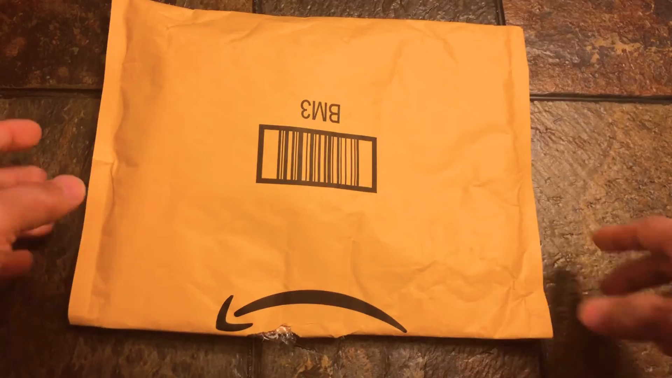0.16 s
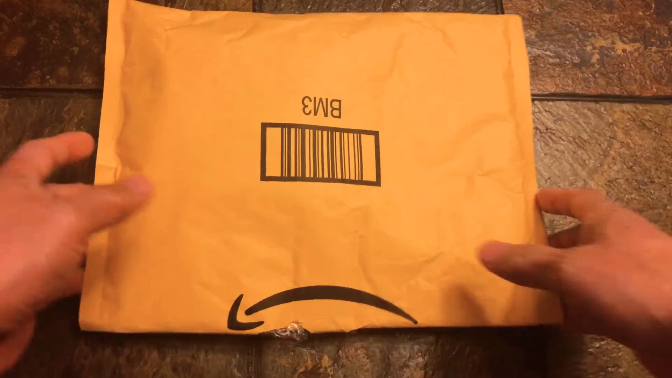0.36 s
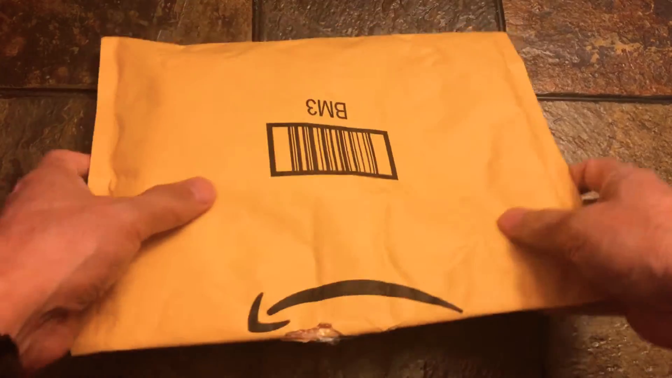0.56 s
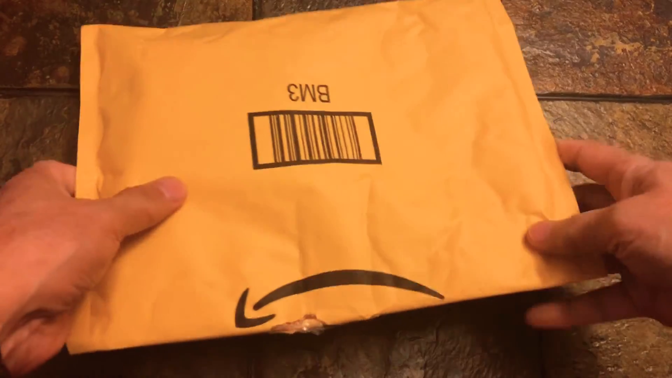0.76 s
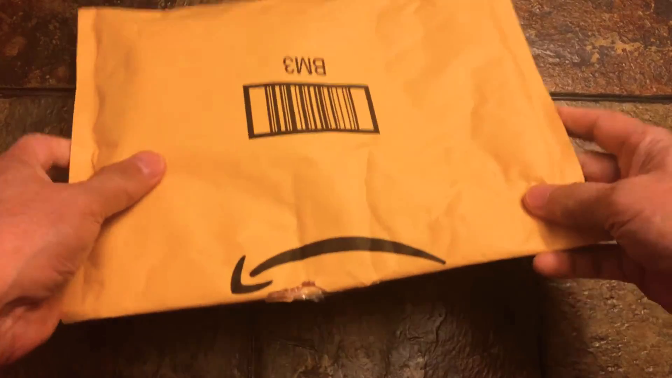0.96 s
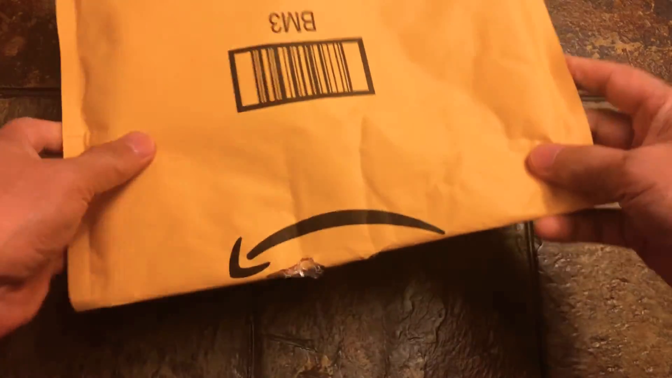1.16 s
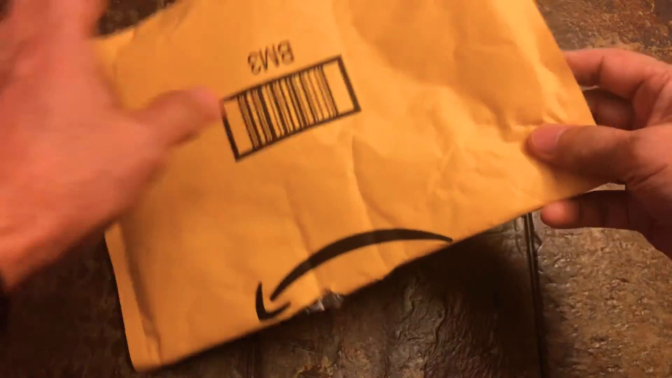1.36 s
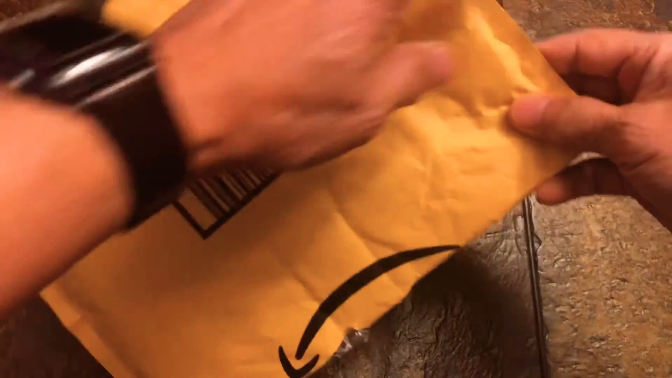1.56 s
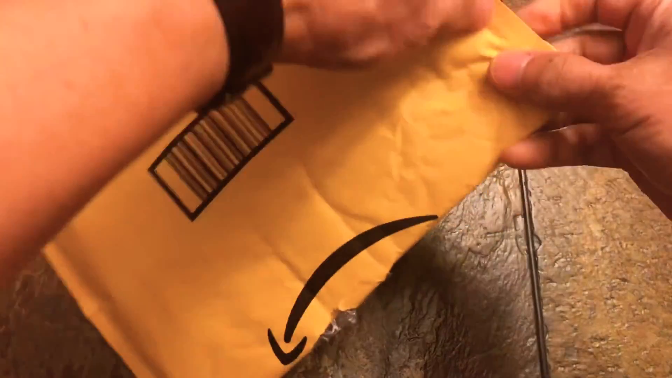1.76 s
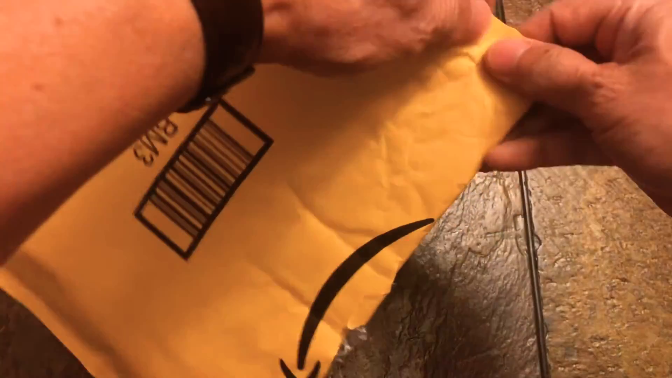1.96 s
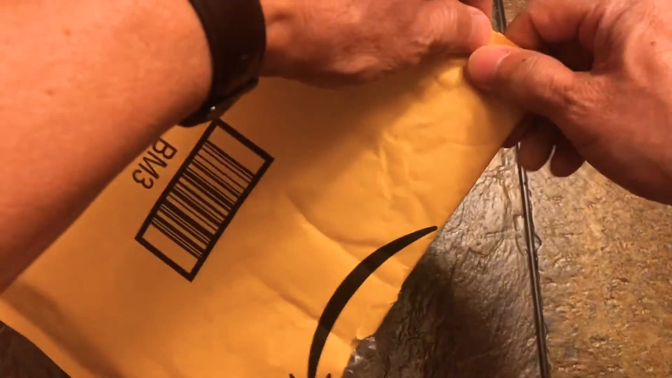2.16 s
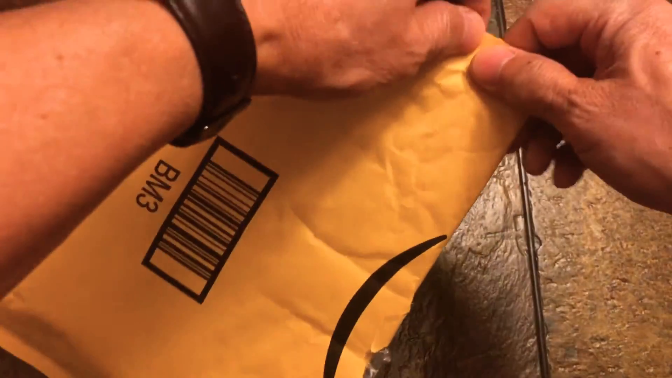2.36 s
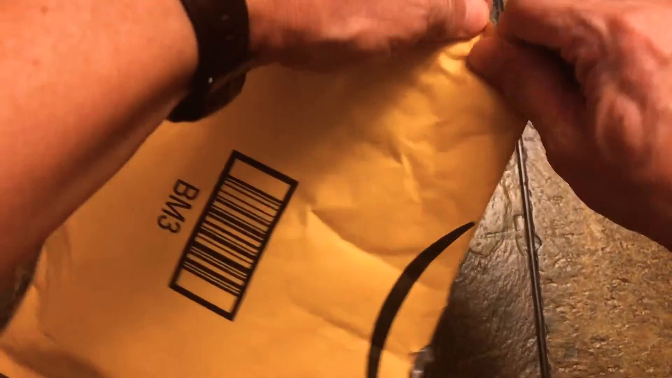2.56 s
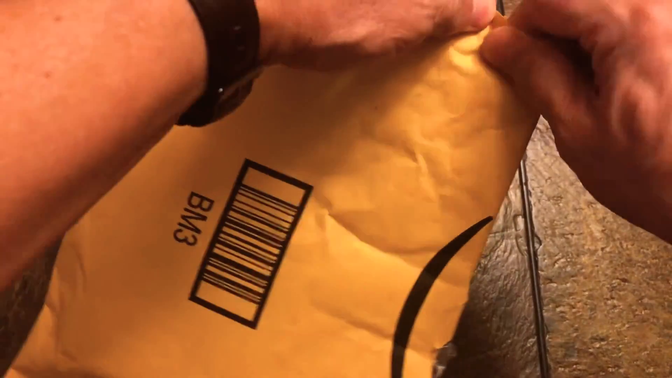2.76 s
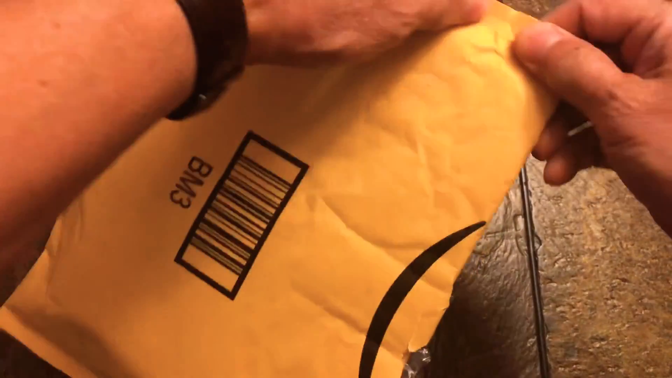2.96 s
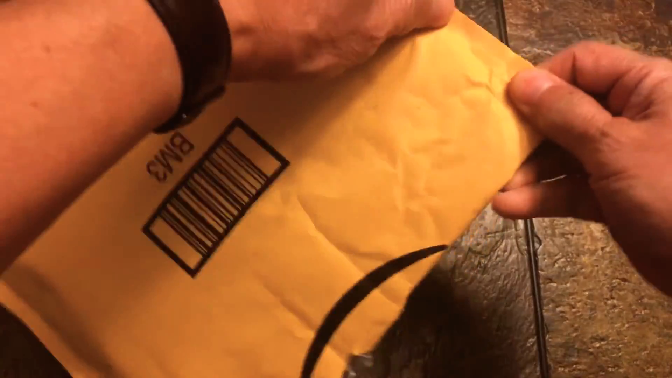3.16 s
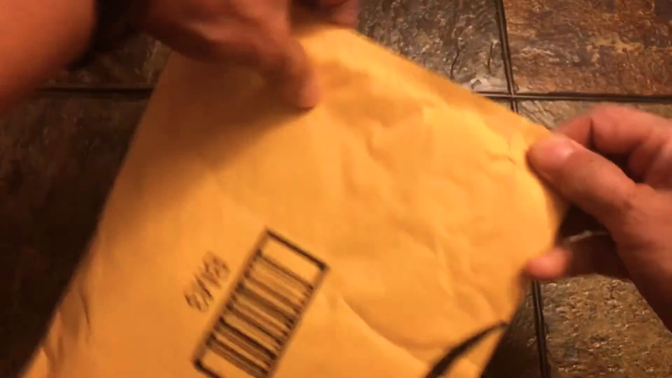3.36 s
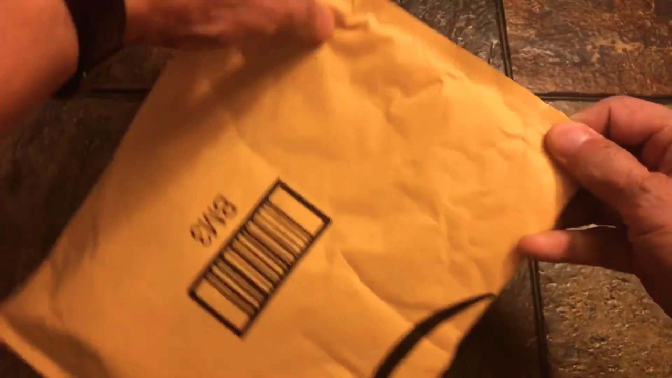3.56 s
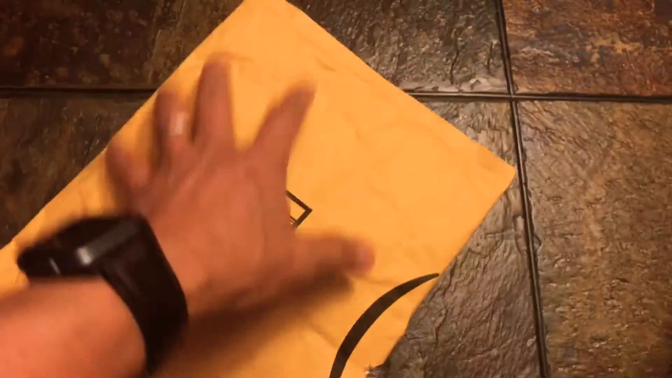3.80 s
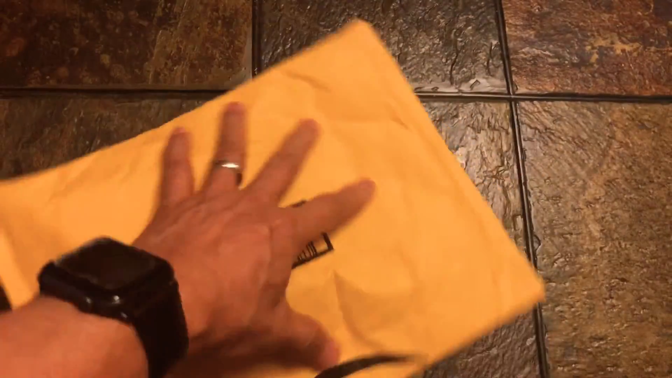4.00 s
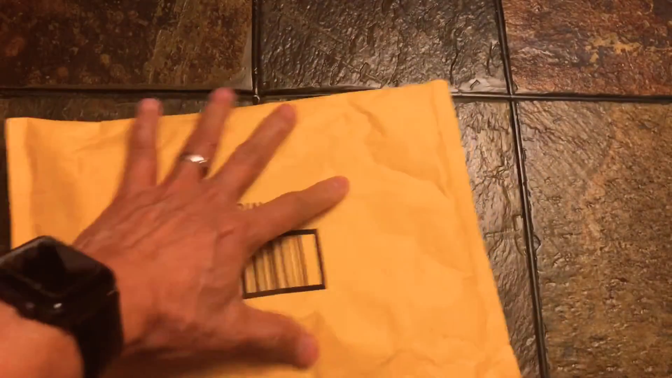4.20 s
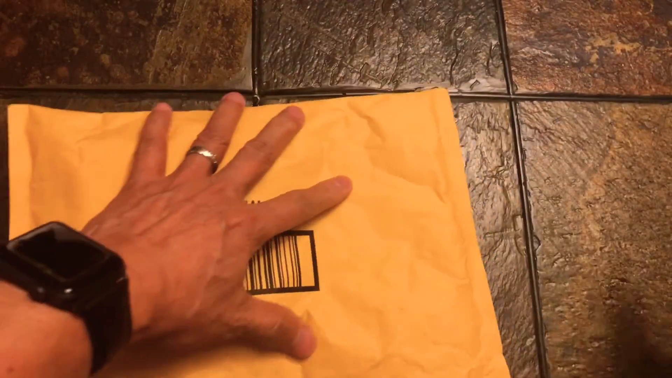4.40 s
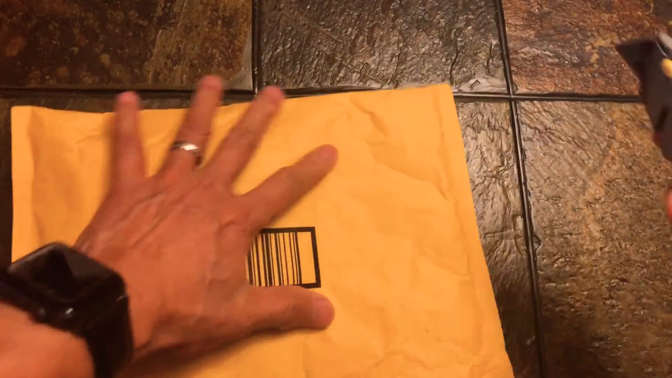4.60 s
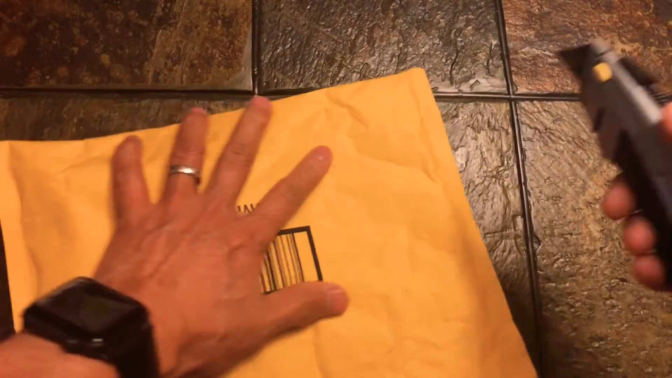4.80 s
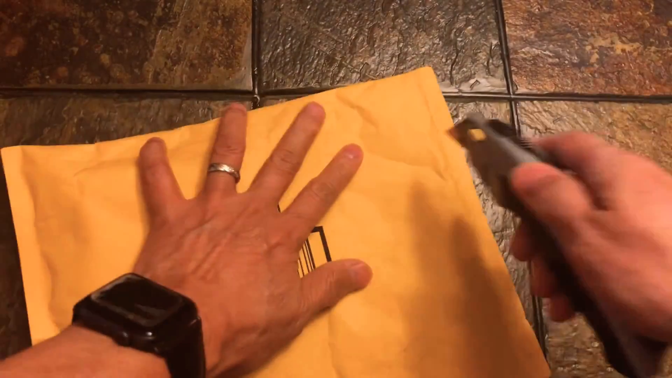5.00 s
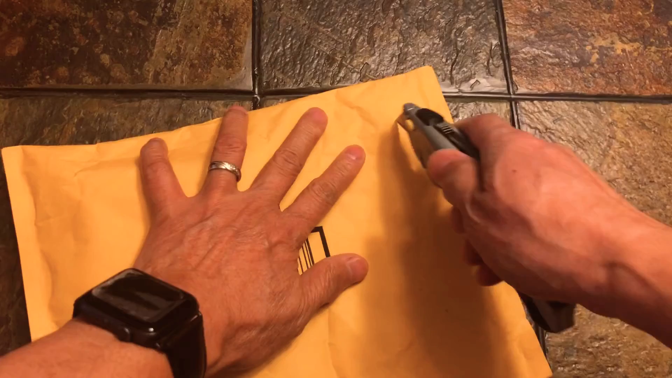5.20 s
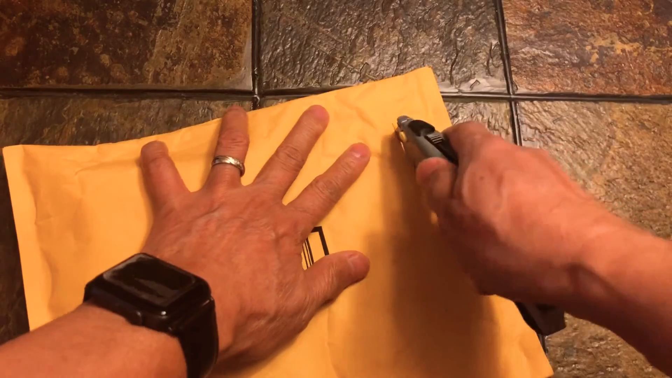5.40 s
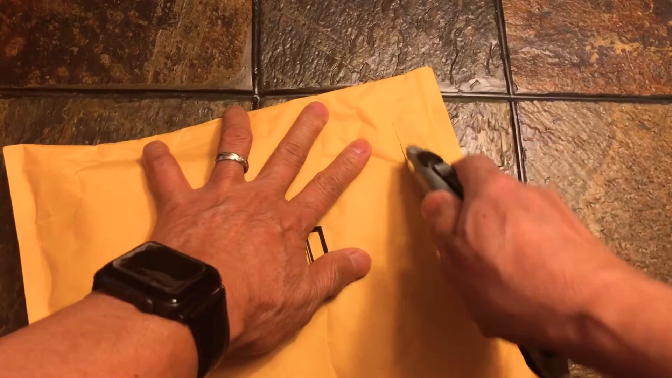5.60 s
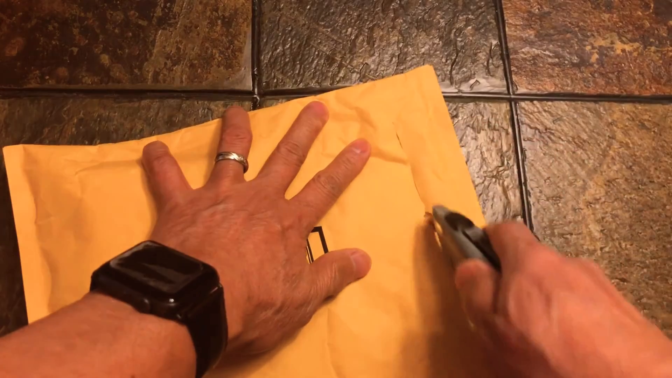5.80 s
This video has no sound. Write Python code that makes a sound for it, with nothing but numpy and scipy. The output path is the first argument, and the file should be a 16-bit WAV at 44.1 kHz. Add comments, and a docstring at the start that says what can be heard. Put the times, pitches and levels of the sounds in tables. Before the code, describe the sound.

Close, dry crackling and rubbing of a thick paper mailer in a quiet hard room, ending with a sharp pop and a rasping cut.

```python
"""Tiled floor, heard up close: hands slide, turn and flex a padded paper mailer.
Rubbing is noise and fibre slips in three bands: padding, sheet, surface.
Buckling creases are short dispersed pulses: single snaps, quick runs, random crinkles; padding bumps are
damped low sines. At the end a knife squeaks, punctures the paper and starts to slit it with a ratchet
of fibre breaks. A small hard room answers the strikes; a faint background noise lies below."""
import sys
import numpy as np
from scipy import signal
from scipy.fft import rfft, irfft, next_fast_len
from scipy.io import wavfile
from scipy.ndimage import uniform_filter1d, map_coordinates

SR = 44100
rng = np.random.default_rng(int(sys.argv[2]) if len(sys.argv) > 2 else 0)


def waveform_to_disk(signal):
    """Save audio, clipped to [-1, 1], as 16-bit WAV at the path in sys.argv[1]."""
    frames = np.transpose(np.atleast_2d(signal))
    scaled = np.clip(frames, -1, 1) * 32767
    samples = np.round(scaled).astype(np.int16)
    wavfile.write(sys.argv[1], SR, samples)


N = 257984
TIME = np.arange(N) / SR  # s
GRAB_S, SLIT_START_S = .4, 5.6


def amp(db):
    """Decibels to gain."""
    return 10 ** (np.asarray(db) / 20)


def unit(x):
    """x at rms 1."""
    return x / np.sqrt(np.mean(x ** 2) + 1e-20)


def along(points, hz):
    """(Hz, value) points read on a log frequency axis."""
    point_hz, value = np.transpose(points)
    return np.interp(np.log(hz + 1), np.log(point_hz), value)


def filtered(x, response):
    """x times a response of frequency."""
    size = next_fast_len(N + SR // 2)
    hz = np.fft.rfftfreq(size, 1 / SR)
    return irfft(rfft(x, size) * response(hz), size)[:N]


def coloured(x, spectrum):
    """x through a spectrum that falls steeply beyond its ends, at rms 1."""
    low_hz, high_hz = spectrum[0][0], spectrum[-1][0]

    def response(hz):
        skirts = np.minimum(hz / low_hz, 1) ** 2 * np.minimum(high_hz / (hz + 1), 1) ** 2
        return amp(along(spectrum, hz)) * skirts
    return unit(filtered(x, response))


def wobble(knots_per_s):
    """Smooth curve through normal random knots."""
    knots = rng.standard_normal(int(N * knots_per_s / SR) + 4)
    return map_coordinates(knots, [TIME * knots_per_s])


def add(track, start_s, sound):
    """Mix a sound into the track, cut at the track's end."""
    span = track[max(round(start_s * SR), 0):][:len(sound)]
    span += sound[:len(span)]


# quiet-room noise: freq_hz, relative_density_db (per Hz)
BACKGROUND_SPECTRUM = [(45, -6), (100, -4), (400, -7), (700, -16), (5000, -22), (15000, -37)]


def background(level_db=-64.5):
    """Steady noise, its density falling towards the treble."""
    return amp(level_db) * coloured(rng.standard_normal(N), BACKGROUND_SPECTRUM)


# hand or blade sliding over paper: start_s, rise_s, length_s, sheet_db,
# padding_rel_db (to sheet), surface_rel_db (to sheet)
SLIDES = [(0, 0.0047, 0.013, -54.5, -25, -2), (0.388, .012, .13, -49.5, -11.5, -0.5),
          (0.519, 0.0085, .105, -38.5, -15.5, -2), (0.681, 0.036, .18, -48.5, -17, 3.5),
          (0.879, 0.033, .19, -51.5, -22, 2), (1.246, .025, .055, -41.5, -16, 0.5),
          (1.367, .07, .17, -45, -13, 0.5), (1.617, .015, .03, -46.5, -4, -24),
          (1.69, 0.016, 0.09, -55, -6, 8.5), (1.797, 0.02, .085, -43, -8, 1.5),
          (1.899, .05, .19, -47, -5, 1), (2.174, 0.015, .2, -56, -21, 6.5),
          (2.503, .11, .125, -43, -7.5, 2), (2.65, 0.025, .06, -48.5, -11, 4.5),
          (2.821, .17, .33, -46, -8, 3.5), (3.191, .02, .065, -43.5, -8, -8),
          (3.322, .02, 0.068, -45.5, -5, 4.5), (3.374, .07, .095, -37, -6.5, -0.5),
          (3.6, .04, 0.096, -39, -9.5, -2), (3.802, 0.011, .015, -44.5, -0.5, -6),
          (3.901, 0.035, .055, -34, -5, -4.5), (3.997, 0.026, .31, -41.5, -9, -2.5),
          (4.409, .11, .12, -45, -6, 4.5), (4.569, .03, .26, -48.5, -19, -1),
          (4.822, .05, .26, -44, -18.5, 0.5), (5.275, .04, .055, -43, -59.5, -2.5),
          (5.357, 0.016, .08, -53, -28, 5), (5.455, 0.0056, .04, -35.5, -17.5, -2.5),
          (5.581, 0.028, 0.13, -43, -6, 4), (5.736, 0.006, 0.092, -37, -6.5, -2.5)]
# faint rub of hands that never quite rest: padding_db, sheet_db, surface_db
HOLDING = (-72, -58.5, -57.5)


def contact(sag_db_per_s=6.5, release_db_per_s=116.5):
    """Padding, sheet, surface levels in dB: slides speed up, slacken and run out, over the holding rub."""
    power = np.outer(amp(HOLDING) ** 2, TIME > GRAB_S)
    for start_s, rise_s, length_s, sheet_db, padding_rel_db, surface_rel_db in SLIDES:
        age_s = np.maximum(TIME - start_s, 0)
        # release adds to the sag once the length is over
        fade_db = sag_db_per_s * age_s + release_db_per_s * np.maximum(age_s - length_s, 0)
        speed = np.minimum(age_s / rise_s, 1) * amp(sheet_db - fade_db)
        power = power + np.outer(amp([padding_rel_db, 0, surface_rel_db]), speed) ** 2
    return 10 * np.log10(power + 1e-12)


def friction(slips_per_s, smooth_rms=.75):
    """Fibres catch and slip: impulses of uneven size at rms 1, over smooth sliding noise."""
    slips = (rng.random(N) < slips_per_s / SR) * rng.standard_normal(N)
    return unit(slips) + smooth_rms * rng.standard_normal(N)


def shifting(x, depth_db):
    """As the sheet bends, its many small resonances come and go."""
    spectrogram = signal.stft(x, nperseg=512)[2]
    field = rng.standard_normal(spectrogram.shape)
    field = uniform_filter1d(field, 4, axis=0)  # over frequency
    field = uniform_filter1d(field, 7, axis=1)  # over time
    return signal.istft(spectrogram * amp(depth_db * unit(field)), nperseg=512)[1][:N]


# spectra of the rubbing parts: freq_hz, relative_density_db (per Hz)
PADDING_SPECTRUM = [(45, -5.5), (85, 0), (150, -3), (195, 4), (250, -1.5), (340, 2.5), (480, -3.5)]
SHEET_SPECTRUM = [(300, -6), (450, 1), (640, -3), (950, 1.5), (1750, 4.5), (2400, -14), (3500, -0.5)]
SURFACE_SPECTRUM = [(1600, -12), (2600, -8.5), (3400, -8), (5500, -8.5), (8200, -9.5), (10500, -13.5),
                    (16000, -19.5)]


def rubbing(padding_db, sheet_db, surface_db):
    """Sliding contact sounds in padding, sheet and surface; wavering grip moves the last two together."""
    grip = wobble(45)
    padding = coloured(rng.standard_normal(N), PADDING_SPECTRUM)
    sheet = coloured(shifting(friction(600), depth_db=3.5), SHEET_SPECTRUM)
    surface = coloured(shifting(friction(1200), depth_db=3.0), SURFACE_SPECTRUM)
    padding = amp(padding_db + 3.65 * wobble(35)) * padding
    sheet = amp(sheet_db - 1.0 + 2.0 * grip) * sheet
    surface = amp(surface_db + grip) * surface
    return padding + sheet + surface


def brightening(rub, surface_db, slope_db_per_db=0.36, neutral_db=-45, corner_hz=9000):
    """Stronger surface sliding opens the top treble; weaker sliding dulls it."""
    top = filtered(rub, lambda hz: hz ** 6 / (hz ** 6 + corner_hz ** 6))
    boost_db = slope_db_per_db * np.clip(surface_db - neutral_db, -12, 12)
    return rub + top * (amp(boost_db) - 1)


def buckle(pitch_hz, crack_db, size=2048):
    """A paper facet flips: short ring, crack, low flap; energy of 1 ms at rms 1."""
    sharp_q, clean_q, clean_below_db = 0.84, 1.5, -48
    crack_hz, dull_hz = 5200, 9000
    flap_db, flap_hz = -13.0, 480  # flap level for a 1900 Hz facet
    body_delay_s, flap_delay_s = 0.000386, .0016  # at 1 kHz
    scatter, scatter_t60_s, scatter_rise_s = 0.61, 0.0095, 0.0017
    hz, t = np.fft.rfftfreq(size, 1 / SR) + 1, np.arange(size) / SR

    def resonance(centre_hz, q):
        return 1 / (1 + 1j * q * (hz / centre_hz - centre_hz / hz))

    # a clean flip, without a crack, rings longer
    q = np.interp(crack_db, [clean_below_db, 0], [clean_q, sharp_q])
    body = unit(resonance(pitch_hz, q) ** 2.16 / (1 + 1j * hz / dull_hz))
    crack = amp(crack_db) * unit(resonance(crack_hz, 0.97) ** 2)
    # small, high-pitched facets hardly move the whole sheet
    flap_gain = amp(flap_db) * 2 / (1 + (pitch_hz / 1900) ** 2)
    flap = flap_gain * unit(resonance(flap_hz, 0.82) ** 2)
    # bending waves: treble arrives first; the flap trails as a falling chirp
    pulse = (body + crack) * np.exp(-4j * np.pi * body_delay_s * np.sqrt(hz * 1000))
    pulse = pulse + flap * np.exp(-2j * np.pi * flap_delay_s * 1000 * np.log(hz))
    # seams and folds throw the wave back for a few milliseconds
    echoes = rng.standard_normal(size) * amp(-60 * t / scatter_t60_s) * (1 - np.exp(-t / scatter_rise_s))
    echoes = echoes / np.linalg.norm(echoes)
    wave = irfft(pulse * (1 + scatter * rfft(echoes)))
    return wave / np.linalg.norm(wave) * np.sqrt(SR / 1000)


def crinkles(sheet_db, count=600):
    """Small facets flip at random, more often and more strongly as the sheet is worked, grab to slit."""
    offset_db, follow_db_per_db, crowding, ceiling_db = -2, 0.85, .055, -28
    median_hz, pitch_spread, size_spread_db = 2100, 0.63, 6.5
    track = np.zeros(N)
    due = np.cumsum(amp(crowding * sheet_db) * (TIME > GRAB_S) * (TIME < SLIT_START_S))
    places = np.searchsorted(due, due[-1] * rng.random(count))
    variations = np.clip(rng.standard_normal((count, 3)), -2, 2)
    for place, (strength, facet, edge) in zip(places, variations):
        wave = buckle(median_hz * np.exp(pitch_spread * facet), crack_db=-12 + 8 * edge)
        level_db = offset_db + follow_db_per_db * sheet_db[place] + size_spread_db * strength
        add(track, place / SR, amp(min(level_db, ceiling_db)) * wave)
    return track


# loud creases buckling: start_s, level_db (energy as 1 ms rms), pitch_hz, crack_rel_db (to body)
SNAPS = [(0.403, -32.5, 1010, -25), (0.445, -31, 3647, -18), (0.465, -31, 4500, -20),
         (0.491, -35.5, 2893, -10), (0.5284, -14, 4970, -40), (0.5993, -19.5, 3790, 0.5),
         (0.6266, -23, 1580, -20.5), (0.6467, -24, 1748, -1), (0.7863, -23, 1740, -15),
         (0.8193, -17, 2220, -2), (0.8597, -27, 1510, -3), (0.937, -30, 607, -19),
         (0.9631, -21.5, 1670, -49), (1.304, -30, 570, -40), (1.4075, -26, 1273, 7),
         (1.4325, -20.5, 1860, -2), (1.468, -8, 2600, -17.5), (1.7222, -27.5, 1340, -6),
         (1.839, -26, 1400, 4), (1.9084, -29.5, 1600, -25), (1.932, -25.5, 400, -7),
         (2.0628, -26, 1850, -23), (2.1968, -8, 4030, 2), (2.2007, -17.5, 2370, 6.5),
         (2.549, -24.5, 1980, -2), (2.581, -13.5, 3400, -5), (2.66, -24.5, 1560, 0.5),
         (2.702, -23.5, 1900, -0.5), (2.7913, -24, 1880, -7), (2.808, -30.5, 630, -36),
         (2.9434, -23, 1280, -9), (2.967, -11.5, 3230, -36), (3.1213, -17, 1630, 9),
         (3.207, -28.5, 750, -7), (3.228, -33, 1360, -7), (3.2747, -21.5, 1990, 0),
         (3.382, -18.5, 1750, -1.5), (3.3992, -21.5, 3470, -12), (3.498, -23, 1410, -12),
         (3.5115, -22.5, 1350, -30), (3.5318, -25, 1480, -18), (3.657, -27, 4370, -16),
         (3.7207, -20, 1420, 0), (3.8274, -23.5, 1190, 1.5), (3.915, -29, 1460, -30),
         (3.9352, -20.5, 3260, -5), (3.9482, -16, 1760, -0.5), (3.9601, -19.5, 1219, -7),
         (4.259, -22, 1400, 11), (4.3116, -15.5, 1540, -45), (4.3205, -20, 1400, -37),
         (4.516, -24.5, 775, -1.5), (4.55, -24, 1560, -20), (4.6007, -17, 1360, 5.5),
         (4.7383, -28, 1150, -17), (4.7856, -22, 1390, -5.5), (4.807, -27, 1410, -18),
         (4.905, -23, 1400, -22), (4.987, -15, 1310, -5.5), (5.048, -11.5, 2040, -5),
         (5.084, -25.5, 2570, -18), (5.1284, -20, 1140, -9), (5.2753, -21, 1300, -7.5),
         (5.28, -22, 1170, 2.5), (5.3175, -20.5, 1620, -22.5), (5.331, -18, 2500, -1),
         (5.4124, -22, 1800, -9), (5.4555, -6.5, 1310, -1.5), (5.5316, -12.5, 2140, 3.5),
         (5.5472, -15.5, 2920, -9), (5.5961, -9, 2950, 1.5), (5.6587, -19, 2770, -5),
         (5.826, -15, 2420, -1.5), (5.8337, -20, 2120, -14)]


def snaps():
    """Loud creases buckle, each at the pitch of its own facet."""
    track = np.zeros(N)
    for start_s, level_db, pitch_hz, crack_rel_db in SNAPS:
        add(track, start_s, amp(level_db) * buckle(pitch_hz, crack_rel_db))
    return track


def hollow(x, ring_hz=950, ring_gain=0.24, dip_hz=620, dip_gain=0.15):
    """Air inside the mailer adds a short ring with a dip below it."""
    def mode(hz, centre_hz):
        return 1 / (1 + 3.5j * (hz / centre_hz - centre_hz / (hz + 1)))
    return filtered(x, lambda hz: 1 + ring_gain * mode(hz, ring_hz) - dip_gain * mode(hz, dip_hz))


# small hard room: freq_hz, t60_s
ROOM_DECAY = [(1500, 0.93), (15000, 0.14)]


def room(x):
    """Convolve with decaying noise of unit energy; treble dies first."""
    hz, t, spectrogram = signal.stft(rng.standard_normal(SR // 2), SR, nperseg=256)
    decay = amp(-60 * t / along(ROOM_DECAY, hz)[:, None])
    tail = signal.istft(spectrogram * decay, SR, nperseg=256)[1]
    return signal.fftconvolve(x, tail / np.linalg.norm(tail))[:N]


# soft bumps of the padded bag: start_s, level_db (before makeup and envelope), pitch_hz (nominal)
BUMPS = [(0.612, -30, 411), (1.657, -35.5, 228), (2.614, -28.5, 260.6), (2.623, -28.5, 138),
         (3.304, -36, 83.6), (3.731, -28.5, 101), (3.828, -30, 172)]


def bumps(t60_s=0.028, attack_s=0.0024, sag_s=0.0072, makeup_db=5.0):
    """Air-filled padding: a low damped push, pitch sagging from 1.23 to 0.73 of nominal."""
    track, t = np.zeros(N), np.arange(SR // 4) / SR
    for start_s, level_db, pitch_hz in BUMPS:
        cycles = pitch_hz * (0.73 * t + .5 * sag_s * (1 - np.exp(-t / sag_s)))
        envelope = amp(level_db + makeup_db - 60 * t / t60_s) * (1 - np.exp(-t / attack_s))
        add(track, start_s, envelope * np.sin(2 * np.pi * cycles))
    return track


# quick runs of breaks, the last three the blade's puncture and tugs:
# start_s, length_s, level_db (median break), pitch_hz (median)
RUNS = [(2.603, 0.02, -36, 1205), (3.445, 0.017, -32.5, 2180), (5.4601, 0.01, -19.5, 2460),
        (5.697, .022, -28, 2220), (5.741, .042, -26, 2430)]


def runs(crack_db=-10, pitch_spread=0.28, size_spread_db=2.5, count=16):
    """Facets and fibres give way one after another, each with its own size and pitch."""
    track = np.zeros(N)
    for start_s, length_s, level_db, pitch_hz in RUNS:
        times_s = start_s + length_s * (np.arange(count) + rng.random(count)) / count
        for break_s, (strength, facet) in zip(times_s, rng.standard_normal((count, 2))):
            wave = buckle(pitch_hz * np.exp(pitch_spread * facet), crack_db)
            add(track, break_s, amp(level_db + size_spread_db * strength) * wave)
    return track


# blade touching the paper: start_s, length_s, pitch_hz
SQUEAK = (5.305, .013, 13400)


def squeak(level_db=-36, width_hz=1600):
    """Thin stick-slip whistle of steel on paper: a noise band under a half-sine envelope."""
    start_s, length_s, pitch_hz = SQUEAK
    band = filtered(rng.standard_normal(N), lambda hz: np.exp(-((hz - pitch_hz) / width_hz) ** 2))
    envelope = np.sin(np.pi * np.clip((TIME - start_s) / length_s, 0, 1))
    return amp(level_db) * unit(band) * envelope


# slit edge's colour over the rubbing: freq_hz, gain_db
SLIT_COLOUR = [(50, -10), (260, 4.5), (600, -11), (1200, -16), (1800, 9), (2900, -3), (6000, 3)]


def slitting(rub, sheet_db, count=100):
    """The slit edge recolours the rub; fibres part in a quick uneven ratchet, each at its own pitch."""
    level_rel_db, size_spread_db = 8.5, 4  # level relative to sheet_db
    median_hz, pitch_spread, fade_in_s = 2450, 0.15, 0.012
    cutting = np.clip((TIME - SLIT_START_S) / fade_in_s, 0, 1)
    rasp = filtered(rub, lambda hz: amp(along(SLIT_COLOUR, hz)))
    track = (1 - cutting) * rub + cutting * rasp
    progress = (np.arange(count) + rng.random(count)) / count
    times_s = SLIT_START_S + progress * (N / SR - SLIT_START_S)
    variations = np.clip(rng.standard_normal((count, 2)), -2, 2)
    for break_s, (strength, fibre) in zip(times_s, variations):
        wave = buckle(median_hz * np.exp(pitch_spread * fibre), crack_db=-22)
        level_db = sheet_db[int(break_s * SR)] + level_rel_db + size_spread_db * strength
        add(track, break_s, amp(level_db) * wave)
    return track


def scene():
    """Rubbing and slitting, strikes with their room, and the background."""
    padding_db, sheet_db, surface_db = contact()
    rub = brightening(rubbing(padding_db, sheet_db, surface_db), surface_db)
    rub = slitting(rub, sheet_db)
    creases = hollow(crinkles(sheet_db) + snaps() + runs())
    strikes = creases + bumps() + squeak()
    return (strikes + amp(-19.0) * room(strikes) + rub + background())[None]


def record(dry, bass_hz=36, top_hz=15950):
    """Clip at full scale, roll off the deepest bass, keep nothing above the band limit."""
    clipped = np.clip(dry[0], -1, 1)
    return filtered(clipped, lambda hz: hz ** 4 / (hz ** 4 + bass_hz ** 4) * (hz < top_hz))[None]


dry = scene()
out = record(dry)
waveform_to_disk(out)
```